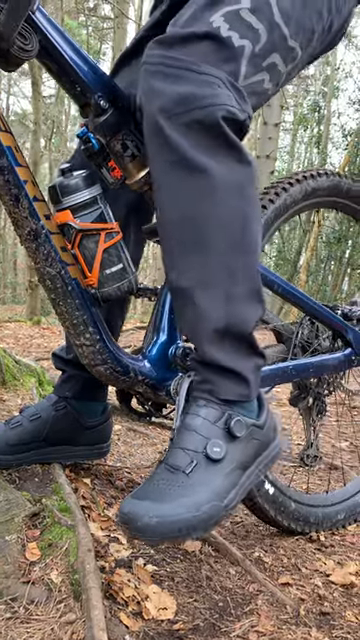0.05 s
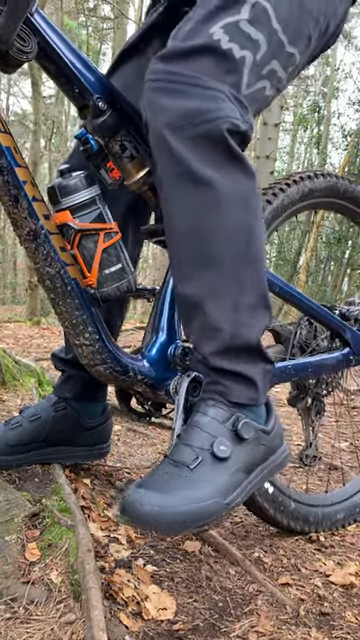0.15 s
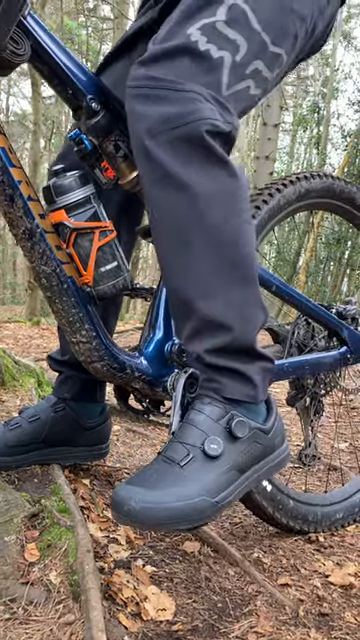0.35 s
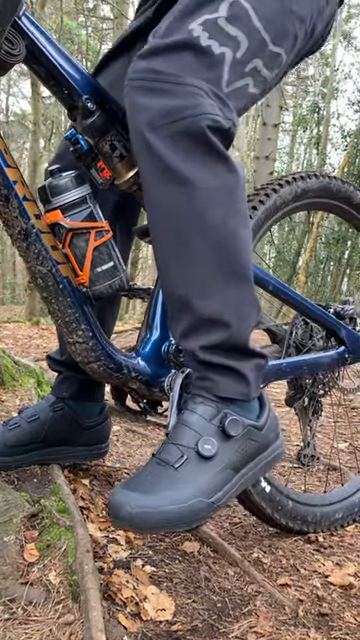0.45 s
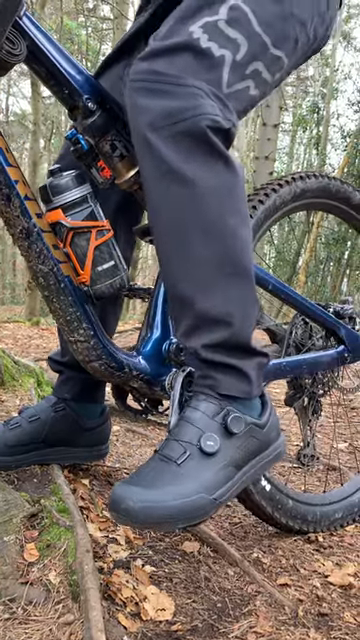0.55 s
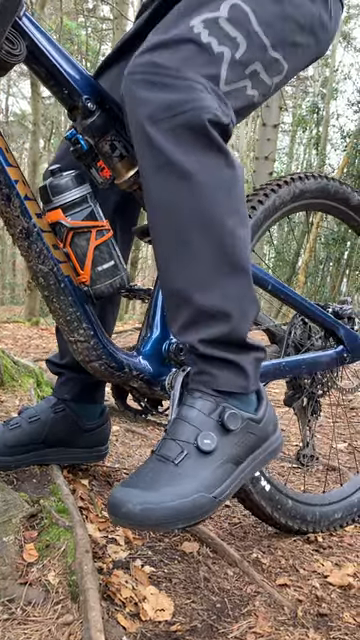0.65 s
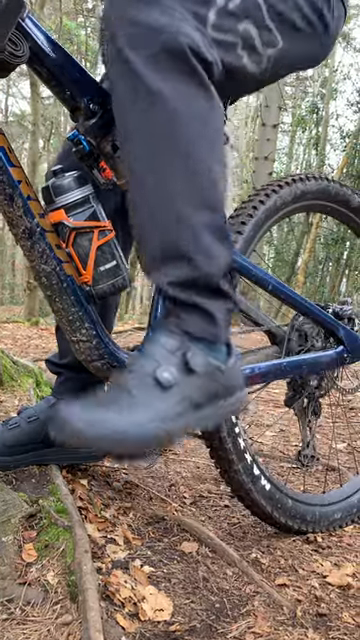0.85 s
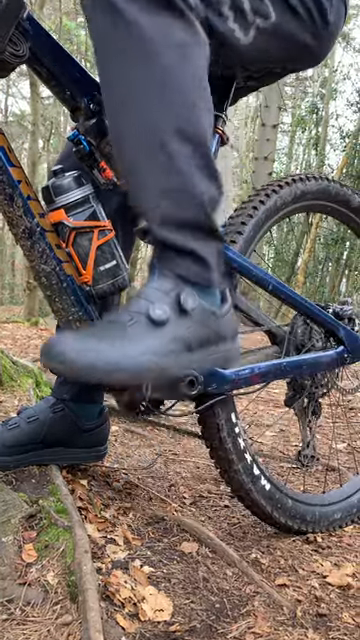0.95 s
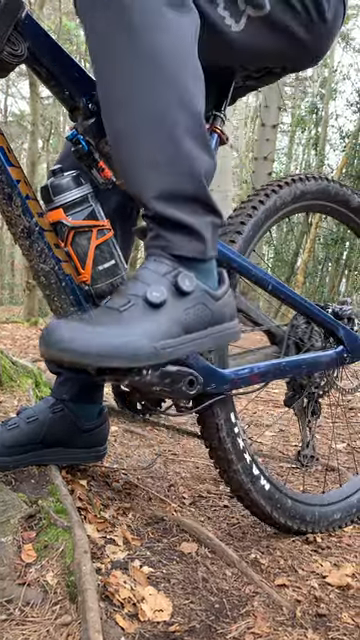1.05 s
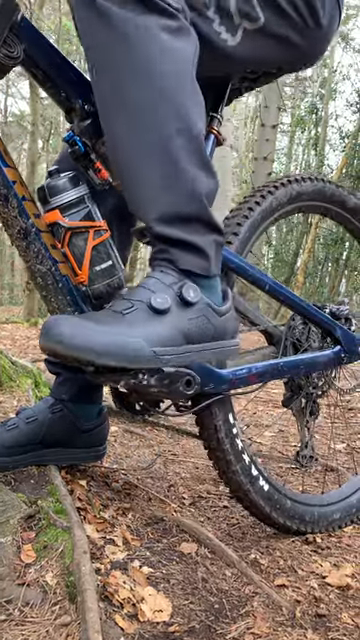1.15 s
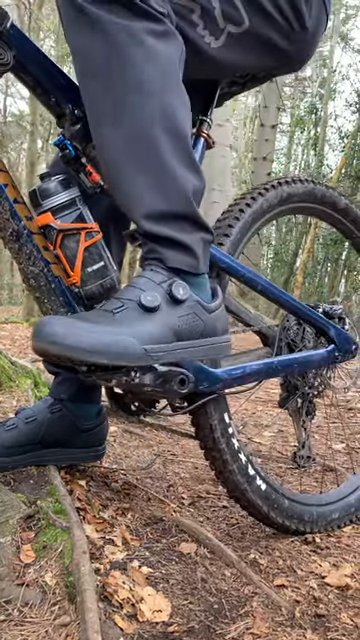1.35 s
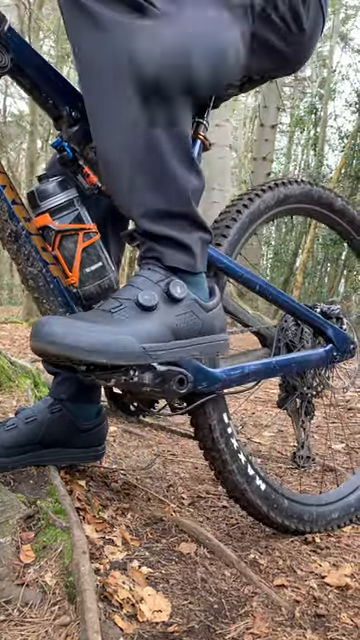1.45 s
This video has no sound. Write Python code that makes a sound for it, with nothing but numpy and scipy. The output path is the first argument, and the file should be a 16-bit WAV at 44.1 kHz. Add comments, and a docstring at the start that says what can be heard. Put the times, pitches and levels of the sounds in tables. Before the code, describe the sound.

Loud sharp cleat click close by, followed by quieter ratchet ticks and dull drivetrain knocks in woods

```python
"""Cleat and pedal in a quiet wood

A shoe cleat clips into a mountain-bike pedal close by: noise bursts crack, and modes of jaw and sole ring.
The crank is then turned back: the freewheel ticks, the chain runs as coloured noise with random catches,
and drivetrain knocks ring the modes of frame and chainring. Soft rubbing is noise strongest near 420 Hz,
cloth adds a faint hiss, and short swelling sines make soft low thuds and tones. Fluttering sine whistles
make faint birds over forest air of diffuse noise, and scatter prolongs each contact.
"""
import sys
import numpy as np
from scipy.fft import rfft, irfft
from scipy.io import wavfile

SR = 44100
rng = np.random.default_rng(int(sys.argv[2]) if len(sys.argv) > 2 else 0)


def int16_out(signal):
    """Quantize to a 16-bit WAV file."""
    q = np.round(np.clip(np.atleast_2d(signal).T, -1, 1) * 32767)
    wavfile.write(sys.argv[1], SR, q.astype(np.int16))


N = 66150
T = np.arange(N) / SR  # time [s]
HZ = np.maximum(np.fft.rfftfreq(2 * N, 1 / SR), 1)  # frequency of each bin [Hz], zero-padded to 2 N

# Contacts of cleat and jaw: t/s, crack level/dB, jaw ring level/dB, sole thud level/dB,
# crack rise/s, crack t60/s
CLEAT_CONTACTS = [(0.2485, -13.5, -34.5, -25.5, 0.00052, 0.013), (0.2545, -18.5, -32.5, -24, 0.0011, 0.027),
                  (0.2571, -6.5, -23.5, -32, 0.00023, 0.016), (0.2600, -23, -31.5, -14.5, 0.0003, 0.015)]
# Colour of the crack: f/Hz, density level/dB per Hz
CRACK_COLOUR = [(200, 5), (600, -4), (1100, -14.5), (2200, 3.5), (3400, -14), (5200, 3.5), (7500, 2),
                (9000, -2), (10300, 6), (11500, 3.5), (13800, -7), (15500, -15), (16500, -30)]
# Modes of the steel jaw and spring, damped by the sole: f/Hz, level/dB re the jaw ring
JAW_MODES = [(1282, -3), (1650, -6.5), (1885, 0), (2100, -6.5), (2521, 4), (2670, -2), (2988, -3.5),
             (3185, -4.5), (4130, 0.5), (4270, 1.5), (4550, -7), (6580, 3), (7450, -19), (8090, -4.5),
             (8840, -8), (9830, 2), (10300, -6), (15400, 1)]
JAW_T60_S = 0.036
# Modes of sole and crank: f/Hz, level/dB re the thud, t60/s
SOLE_MODES = [(49.6, -21, 0.15), (139.7, -12, 0.1), (151.7, -31, 0.53), (281, -7.5, 0.024), (342, 5, 0.018),
              (454, -5, 0.027), (558, -7, 0.026), (674, -6, 0.015), (826, -29, 0.0585)]
# Cleat sliding on the jaw: t/s, level/dB
SLIDE_LEVEL = [(0.232, -55), (0.243, -47), (0.248, -26.5), (0.255, -22), (0.266, -41), (0.275, -69)]
# Colour of the sliding: f/Hz, density level/dB per Hz
SLIDE_COLOUR = [(150, 0.5), (500, 11), (1500, 6), (4500, 11), (7500, 2.5), (10000, -10), (16000, -24.5)]


def cleat():
    """Friction and impact: sliding gives noise; each contact cracks and excites modes of jaw and sole."""
    out = level(SLIDE_LEVEL) * noise(SLIDE_COLOUR)
    jaw_modes = [(hz, db, JAW_T60_S) for hz, db in JAW_MODES]
    for s, crack_db, jaw_db, thud_db, rise, t60 in CLEAT_CONTACTS:
        out = out + burst(CRACK_COLOUR, s, crack_db, rise, t60)
        out = out + ring(jaw_modes, s, jaw_db)
        out = out + ring(SOLE_MODES, s, thud_db)
    return out


# Freewheel ticks: t/s, level/dB
TICKS = [(0.5376, -62), (0.546, -55), (0.7915, -38.5), (0.839, -38.5), (0.8818, -39.5), (0.903, -66),
         (0.9199, -39), (0.9318, -38), (0.959, -41), (1, -41.5), (1.1893, -59.5)]
# Colour of a tick: f/Hz, density level/dB per Hz
TICK_COLOUR = [(600, -12), (1500, -4), (2600, -9.5), (4200, -2.5), (6500, -4.5), (7600, 3.5), (9000, -2),
               (10300, -0.5), (12000, -2.5), (14300, -3.5), (16000, -27)]
# Modes of the pawl: f/Hz, level/dB re the pawl ring, t60/s
PAWL_MODES = [(2610, 1, .05), (2820, -8, .04), (7420, 7, 0.031), (7900, -6, 0.066), (9780, 5, 0.022),
              (13600, -7.5, .02)]
TICK_RISE_S, TICK_T60_S = 0.0013, 0.026
PAWL_DB = -15  # pawl ring re its tick


def freewheel():
    """Ratchet impacts: the pawl drops over one tooth after another, and each blow excites its modes."""
    out = 0
    for s, db in TICKS:
        out = out + burst(TICK_COLOUR, s, db, TICK_RISE_S, TICK_T60_S)
        out = out + ring(PAWL_MODES, s, db + PAWL_DB)
    return out


# Drivetrain knocks: t/s, clack level/dB, frame ring level/dB, chainring ring level/dB
KNOCKS = [(0.8573, -27.5, -23, -36), (0.9030, -54, -39.5, -58), (0.9327, -34.5, -25.5, -36),
          (0.9450, -42, -42, -59), (1.003, -55, -44.5, -47), (1.0620, -51, -52.5, -53)]
# Colour of the clack: f/Hz, density level/dB per Hz
KNOCK_COLOUR = [(150, 5), (500, 8.5), (750, 6), (1000, 17.5), (1350, 2), (2100, -40), (3000, 9),
                (3700, -30), (5000, 2.5), (8000, -18), (15000, -42)]
# Modes of frame and wheel: f/Hz, level/dB re the frame ring, t60/s
FRAME_MODES = [(351.6, -19, 0.68), (415.2, -12.5, 0.23), (606, -17.5, 0.11), (681, -9.5, 0.12),
               (833, -29.5, 0.52), (851, -23, 0.63), (860, -5.5, 0.049), (890, -27, 0.079),
               (913, -2.5, 0.055), (941, -24, 0.11), (1305, -18.5, 0.12), (1596, -22, 0.11)]
# Modes of the chainring: f/Hz, level/dB re the chainring ring, t60/s
CHAINRING_MODES = [(2786, 2, 0.033), (3110, 0, 0.03), (3920, -3.5, 0.027), (6440, -2.5, 0.035)]
# Chain running over the sprockets: t/s, level/dB
CHAIN_LEVEL = [(0.78, -73), (0.85, -60), (0.872, -46), (0.95, -46), (1.01, -45.5), (1.08, -54), (1.17, -55),
               (1.23, -73), (1.5, -71)]
# Colour of the running chain: f/Hz, density level/dB per Hz
CHAIN_COLOUR = [(30, -26.5), (55, 2), (72, 7.5), (120, -7), (280, -2.5), (350, 5.5), (380, 6), (415, 16),
                (490, -9.5), (580, 7), (675, -5.5), (740, -23), (840, 12), (930, -9), (1100, -2),
                (1350, -18), (1900, -9), (2800, -14.5), (5000, -15.5), (8000, -21), (15000, -24)]
KNOCK_RISE_S, KNOCK_T60_S, FRAME_LAG_S = 0.001, 0.03, 0.002
CHAIN_FLUTTER_DB, CHAIN_FLUTTER_HZ = 1.2, 90  # rms depth and bandwidth


def drivetrain():
    """Rolling and impact excitation: the chain makes fluttering noise; knocks ring frame and chainring."""
    flutter = from_db(CHAIN_FLUTTER_DB * drift(CHAIN_FLUTTER_HZ))
    running = rms_one(noise(CHAIN_COLOUR) * flutter)
    out = level(CHAIN_LEVEL) * (running + grit())
    for s, clack_db, frame_db, chainring_db in KNOCKS:
        out = out + burst(KNOCK_COLOUR, s, clack_db, KNOCK_RISE_S, KNOCK_T60_S)
        out = out + ring(FRAME_MODES, s + FRAME_LAG_S, frame_db)
        out = out + ring(CHAINRING_MODES, s, chainring_db)
    return out


# Colour of links catching on the teeth: f/Hz, density level/dB per Hz
GRIT_COLOUR = [(500, 0), (1300, 9), (2000, -5), (2900, -22), (4500, -3.5), (8000, 1), (15000, -9)]
GRIT_PER_S, GRIT_DB = 670, -13.5  # mean rate; level re the running chain


def grit():
    """Random impulse train: chain links catch at independent moments with random strength."""
    catches = (rng.random(N) < GRIT_PER_S / SR) * rng.standard_normal(N)
    return from_db(GRIT_DB) * rms_one(filtered(catches, from_db(at_hz(GRIT_COLOUR))))


# Soft rubbing: t/s, level/dB
RUBBING_LEVEL = [(0, -43), (0.1, -52), (0.22, -52.5), (0.32, -59), (0.41, -58.5), (0.5, -60.5),
                 (0.8, -68.5), (1.15, -61), (1.35, -61), (1.5, -64)]
# Colour of the rubbing, with the frame's resonances: f/Hz, density level/dB per Hz
RUBBING_COLOUR = [(100, -5.5), (280, -5.5), (350, 6.5), (380, -0.5), (420, 17.5), (470, -13.5), (570, 9),
                  (730, -7), (860, 0.5), (1150, -6), (1600, -17), (3000, -29.5), (9000, -37),
                  (15000, -41.5)]


def rubbing():
    """Resonant friction noise: soft rubbing hums in the frame's resonances, strongest near 420 Hz."""
    return level(RUBBING_LEVEL) * diffuse(RUBBING_COLOUR)


# Faint hiss of brushing cloth: t/s, level/dB
CLOTH_LEVEL = [(0.5, -81), (0.62, -73.5), (0.78, -62), (1.08, -87), (1.17, -58.5), (1.23, -70.5),
               (1.36, -78), (1.44, -62), (1.5, -61.5)]
# Colour of the hiss: f/Hz, density level/dB per Hz
CLOTH_COLOUR = [(1000, -21.5), (2000, -24.5), (4300, 11), (6000, 8), (9000, 9), (15000, -2)]


def cloth():
    """Friction noise: brushing cloth gives a faint hiss, alike in both ports before their phase lag."""
    return level(CLOTH_LEVEL) * noise(CLOTH_COLOUR)


# Soft low thuds and tones, among them a 155 Hz ring after the snap: t/s, f/Hz, level/dB, length/s
LOW_TONES = [(0.36, 155.3, -65, 0.154), (0.395, 393.5, -49.5, 0.034), (0.858, 74.1, -47, 0.093),
             (0.935, 74.4, -46, 0.07), (1.105, 213, -47.5, 0.024), (1.235, 76, -54, 0.055)]


def low_tones():
    """Amplitude-modulated sines: soft low thuds and tones, each of one pitch under a half-sine swell."""
    out = 0
    for s, hz, db, length in LOW_TONES:
        swell = np.sin(np.pi * np.clip((T - s) / length, 0, 1))
        out = out + from_db(db) * swell * np.sin(2 * np.pi * hz * (T - s))
    return out


# Far birds: start t/s, length/s, start f/Hz, end f/Hz, level/dB, rms waver of f/Hz
BIRDS = [(0.02, 0.22, 8950, 8250, -64, 60), (-0.02, 0.22, 7850, 7750, -72, 60),
         (0.5, 0.26, 4100, 3750, -69, 170)]
BIRD_WAVER_RATE_HZ = 200  # bandwidth of the waver and of the flutter


def birds():
    """Frequency and amplitude modulation: thin falling whistles waver and flutter, blurred by distance."""
    out = 0
    for s, length, start_hz, end_hz, db, waver_hz in BIRDS:
        along = np.clip((T - s) / length, 0, 1)
        glide = start_hz + (end_hz - start_hz) * along
        hz = glide + waver_hz * drift(BIRD_WAVER_RATE_HZ)
        strength = from_db(db) * np.sin(np.pi * along) * drift(BIRD_WAVER_RATE_HZ)
        out = out + strength * np.sin(2 * np.pi * np.cumsum(hz) / SR)
    return out


# Colour of the forest air: f/Hz, density level/dB per Hz
AIR_COLOUR = [(25, -23.5), (70, 2), (105, -4.5), (155, 2), (220, -4), (330, -9), (420, -3), (520, -10),
              (850, -7), (1400, -16), (2800, -25.5), (5000, -24.5), (9000, -27.5), (15000, -44)]
AIR_DB = -56.5


def forest_air():
    """Diffuse field: steady coloured noise arrives from all around."""
    return from_db(AIR_DB) * diffuse(AIR_COLOUR)


# Colour of the scattered sound: f/Hz, level/dB
WOOD_COLOUR = [(100, 9), (400, 1), (1000, -1.5), (2500, 5), (5000, 1.5), (8000, -0.5), (11000, -5.5),
               (16000, -10.5)]
NEAR_DB, NEAR_T60_S = -16, 0.067  # scatter from the bike and ground
WOOD_DB, WOOD_T60_S = -27.5, 0.81  # scatter from the trunks


def wood(x):
    """Energy decay by scattering: octave bands linger as diffuse noise, briefly nearby, longer from trunks."""
    linger = 0
    for db, t60 in ((NEAR_DB, NEAR_T60_S), (WOOD_DB, WOOD_T60_S)):
        decay = rms_one(from_db(-60 * T / t60))
        linger = linger + (from_db(db) * decay) ** 2 / N
    response = rfft(linger, 2 * N)
    scatter = diffuse(WOOD_COLOUR)
    out = 0
    for hz in SR / 4 / 2 ** np.arange(8):
        band = np.cos(np.pi / 2 * np.clip(np.log2(HZ / hz), -1, 1))
        band_sound = filtered(x, band * from_db(at_hz(WOOD_COLOUR)))
        energy = filtered(band_sound ** 2, response)
        out = out + np.sqrt(np.abs(energy)) * rms_one(filtered(scatter, band ** 2))
    return out


EVENNESS = 0.6  # spectral whitening of a contact's ring: 0 none, 1 flat before colouring


def burst(colour, s, db, rise, t60):
    """High modal density: one contact's quickly dying ring is coloured noise that decays exponentially."""
    onset = np.clip((T - s) / rise, 0, 1)
    envelope = onset * from_db(-60 * np.maximum(T - s - rise, 0) / t60)
    spectrum = rfft(rng.standard_normal(N) * envelope, 2 * N)
    spectrum = spectrum / (np.abs(spectrum) + 1e-12) ** EVENNESS
    spectrum = spectrum * from_db(at_hz(colour))
    sound = rms_one(irfft(spectrum)[:N] * onset)
    return from_db(db) * sound * np.sqrt(np.mean(envelope ** 2))


RING_RISE_CYCLES = 0.35  # time constant of a mode's build-up, in cycles


def ring(modes, s, db):
    """Modal superposition: one blow excites damped modes, whose surface velocity radiates."""
    age = np.maximum(T - s, 0)
    out = 0
    for hz, mode_db, t60 in modes:
        decay = from_db(db + mode_db - 60 * age / t60)
        build_up = 1 - np.exp(-age * hz / RING_RISE_CYCLES)
        motion = decay * build_up * np.sin(2 * np.pi * hz * age)
        # the difference is velocity; the divisor undoes its gain at the mode's frequency
        out = out + np.diff(motion, prepend=0) / (2 * np.sin(np.pi * hz / SR))
    return out


def noise(colour):
    """Spectral shaping: white noise filtered to a colour, at unit rms."""
    return rms_one(filtered(rng.standard_normal(N), from_db(at_hz(colour))))


def drift(hz):
    """Band-limited fluctuation: low-passed random motion with unit rms."""
    return rms_one(filtered(rng.standard_normal(N), 1 / (1 + (HZ / hz) ** 2)))


# Decorrelation of the ambience: f/Hz, share unlike in the two ports (0-1)
UNLIKE_SHARE = [(60, 0.079), (250, 0.12), (700, 0.71), (2000, 0.98), (4000, 0.6), (5500, .05), (15000, .05)]


def diffuse(colour):
    """Interchannel decorrelation: mid and side noise give partly unlike channels, as from all around."""
    unlike = np.clip(at_hz(UNLIKE_SHARE), 0, 1)
    mid = filtered(noise(colour), np.sqrt(2 - unlike))
    side = filtered(noise(colour), np.sqrt(unlike))
    return rms_one(np.array([mid + side, mid - side]))


def placed(x, balance):
    """Level difference: a close source is louder on one side in each band."""
    half_db = np.array([[0.5], [-0.5]])
    return filtered(x, from_db(at_hz(balance) * half_db))


# Phase between two microphone ports: f/Hz, lead of the left/rad
PORT_PHASE = [(100, 0), (400, -.1), (1000, -.5), (1500, -1.3), (2300, 2.0), (3000, 1.7), (4200, 2.0),
              (5300, 3.2), (6500, 4.0), (8500, 6.15), (10000, 7.7), (11800, 9.4), (14500, 12.3),
              (16000, 12.6)]


def ports(pair):
    """Phase difference: the right port is shifted against the left by an angle set by frequency."""
    return filtered(pair, np.exp(-1j * at_hz(PORT_PHASE) * np.array([[0], [1]])))


def from_db(db):
    """Logarithmic level: decibels to amplitude gain."""
    return 10 ** (np.asarray(db) / 20)


def rms_one(x):
    """Normalisation: scale to unit rms."""
    return x / np.sqrt(np.mean(x ** 2) + 1e-20)


def at_hz(points):
    """Logarithmic frequency: interpolate a table along log f."""
    hz, value = np.transpose(points)
    return np.interp(np.log(HZ), np.log(hz), value)


def level(points):
    """Envelope: gain from a t/s, level/dB curve, silent outside it."""
    return from_db(np.interp(T, *np.transpose(points), left=-200, right=-200))


def filtered(x, response):
    """Linear filtering: multiply the spectrum by a frequency response."""
    return irfft(rfft(x, 2 * N) * response)[..., :N]


# Left minus right for the pedal: f/Hz, level difference/dB
PEDAL_BALANCE = [(200, 0.5), (850, 4.5), (1700, -10.5), (2400, 1), (3400, -3.5), (4400, -4.5), (6200, -4.5),
                 (9000, 0.5), (15000, -3.5)]
# Left minus right for freewheel and drivetrain: f/Hz, level difference/dB
BIKE_BALANCE = [(200, 1), (950, 4.5), (1500, -4.5), (3100, -2), (3900, -2.5), (8000, -1), (15000, 0.5)]


def scene():
    """Superposition: pedal and bike close by, soft rubbing, cloth and low tones, the wood around them."""
    pedal = cleat()
    bike = freewheel() + drivetrain()
    close = placed(pedal, PEDAL_BALANCE) + placed(bike, BIKE_BALANCE)
    soft = rubbing() + cloth() + low_tones()
    forest = forest_air() + birds() + wood(pedal + bike)
    return ports(close + soft + forest)


CUTOFF_HZ = 16000


def record(dry):
    """Saturation and band-limiting: the highest peaks are rounded and the top is cut."""
    return filtered(np.tanh(dry), 1 / np.sqrt(1 + (HZ / CUTOFF_HZ) ** 160))


dry = scene()
out = record(dry)
int16_out(out)
```